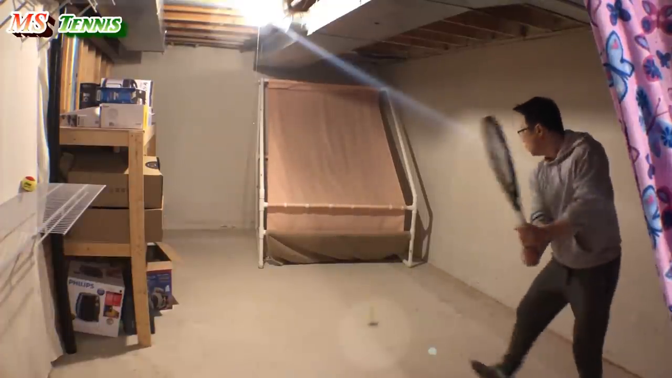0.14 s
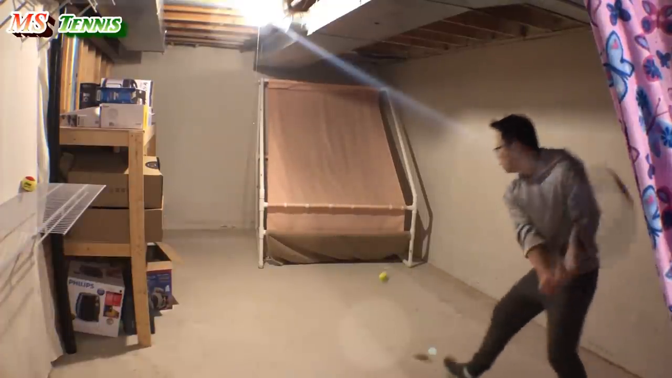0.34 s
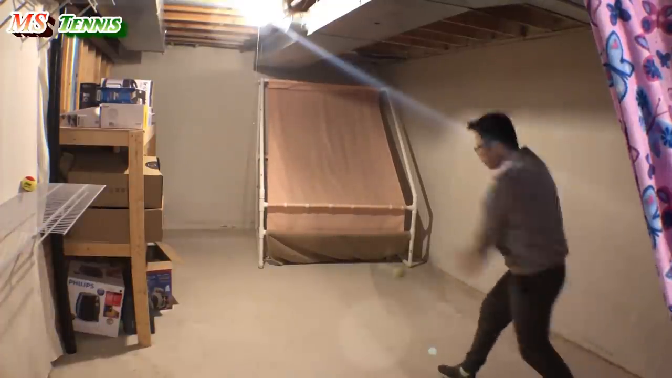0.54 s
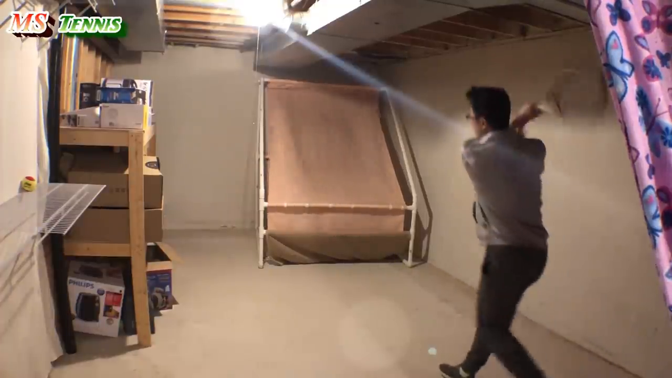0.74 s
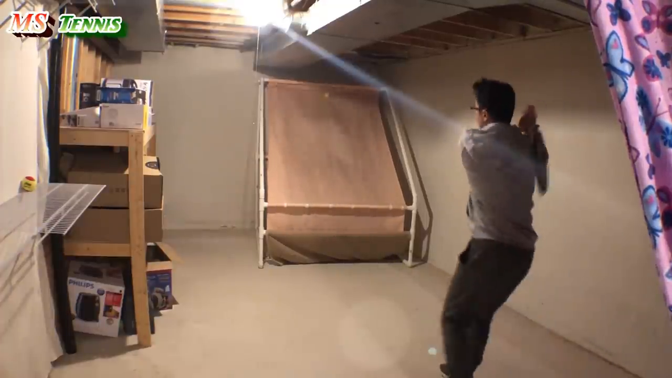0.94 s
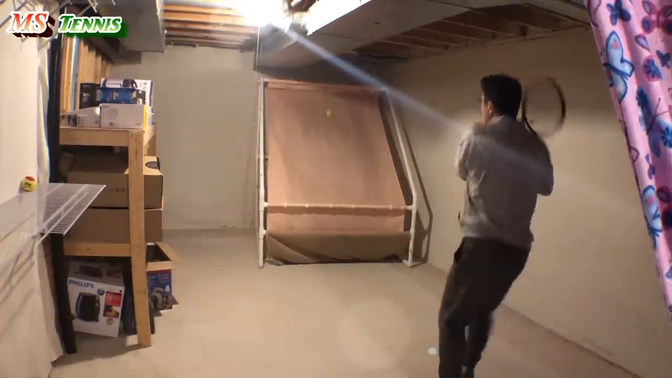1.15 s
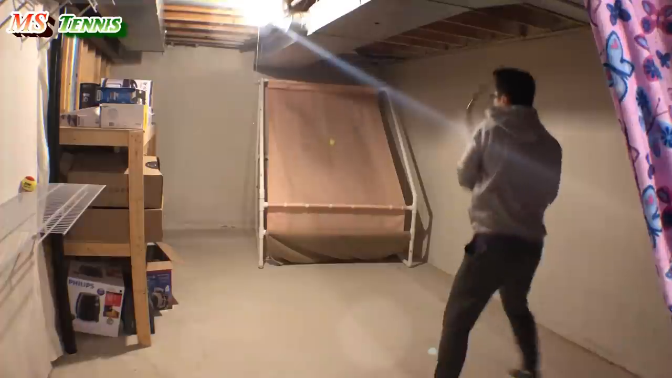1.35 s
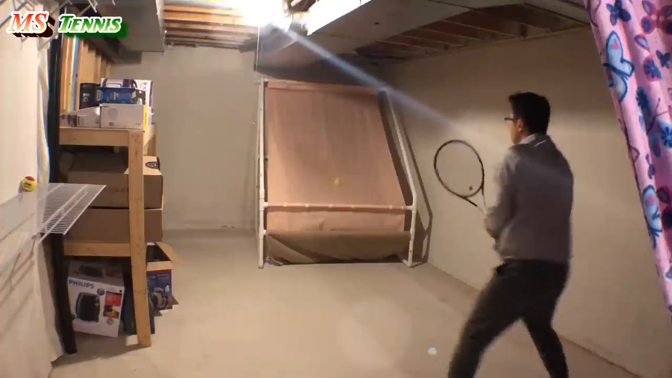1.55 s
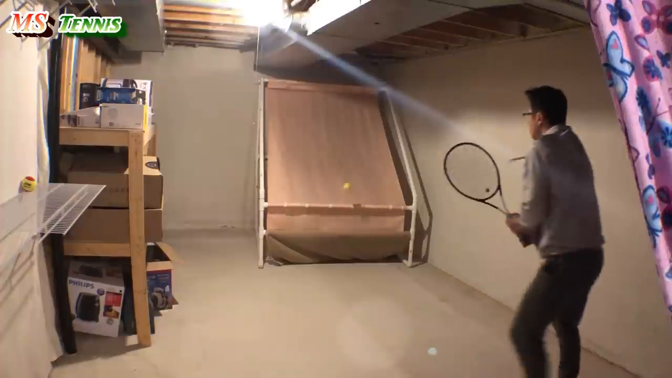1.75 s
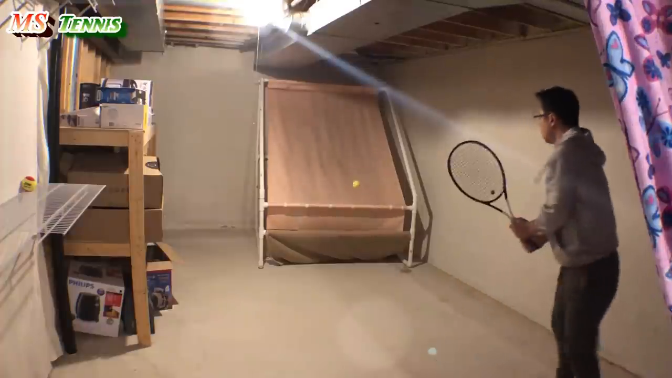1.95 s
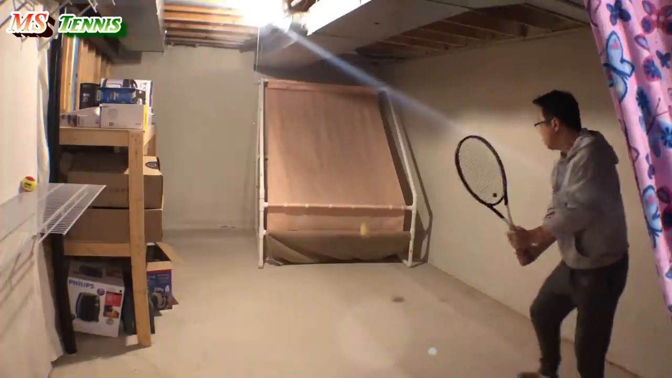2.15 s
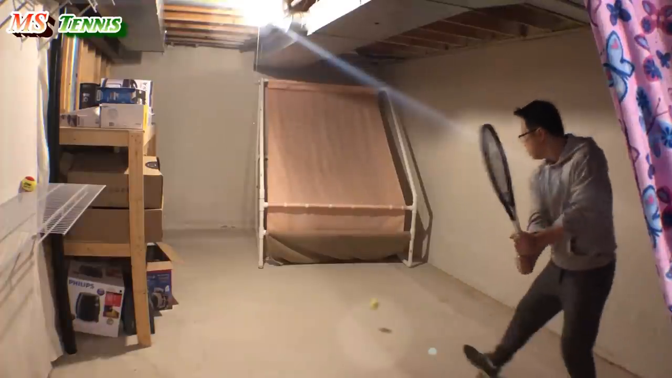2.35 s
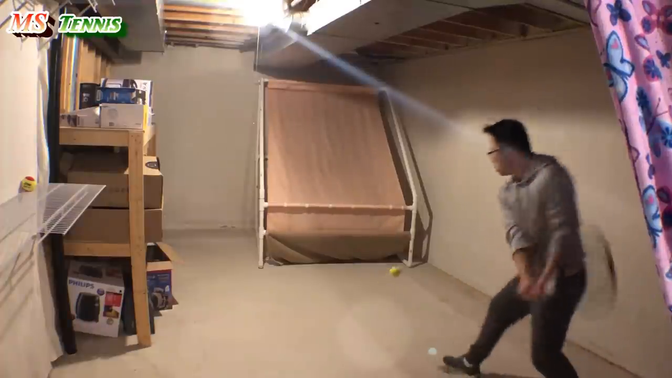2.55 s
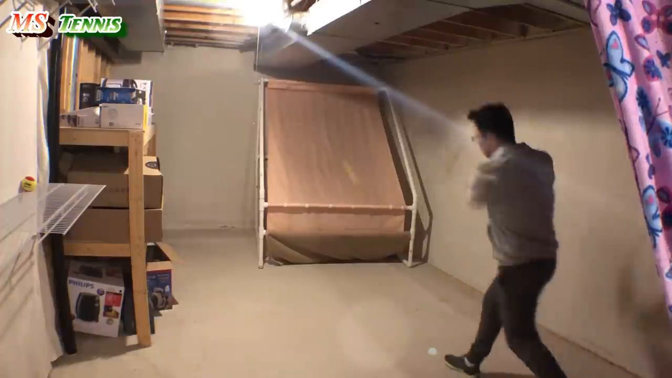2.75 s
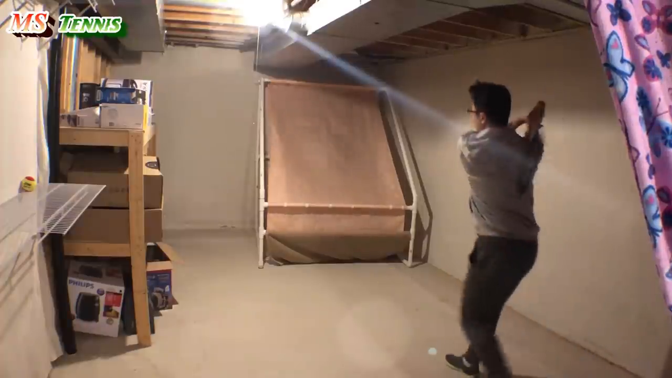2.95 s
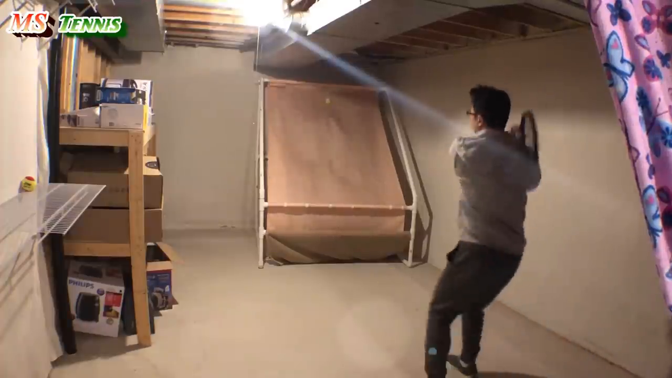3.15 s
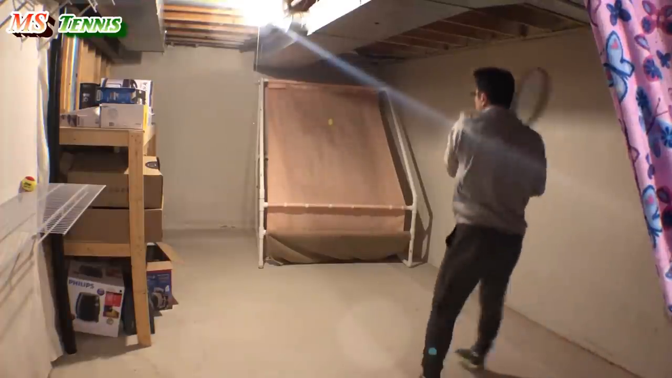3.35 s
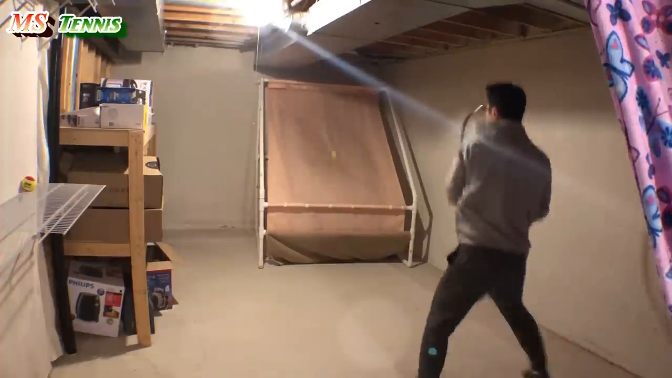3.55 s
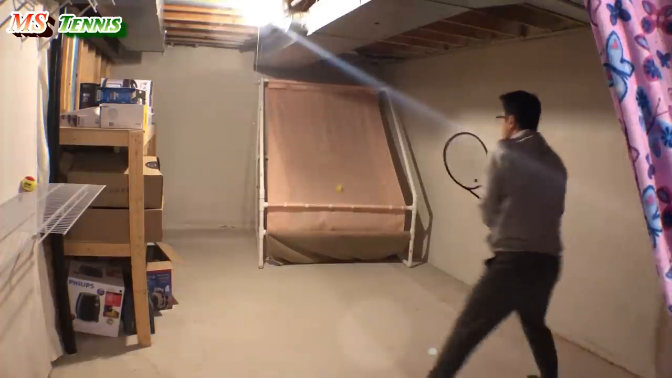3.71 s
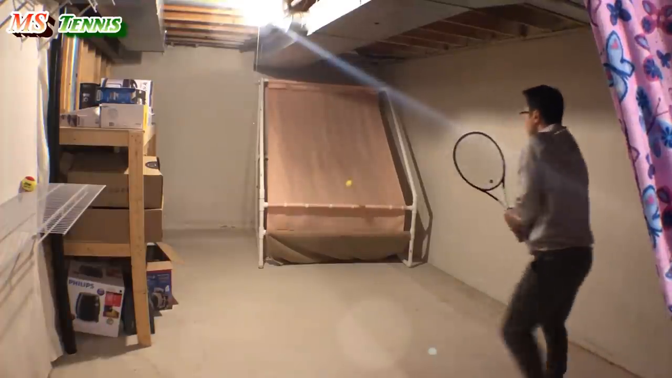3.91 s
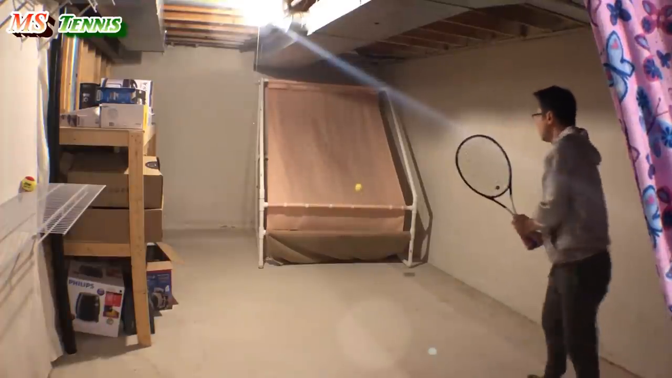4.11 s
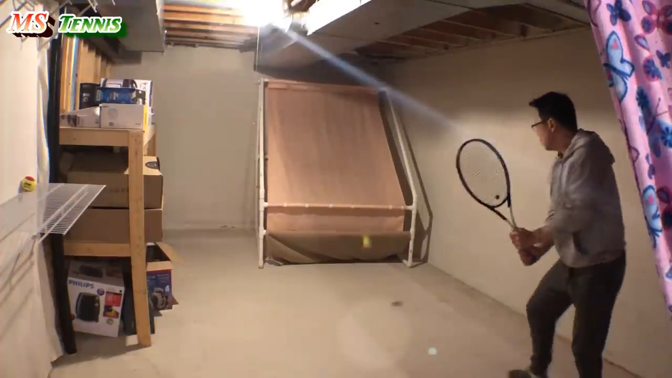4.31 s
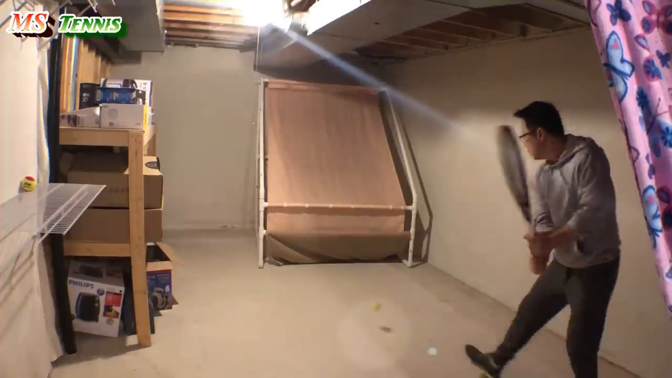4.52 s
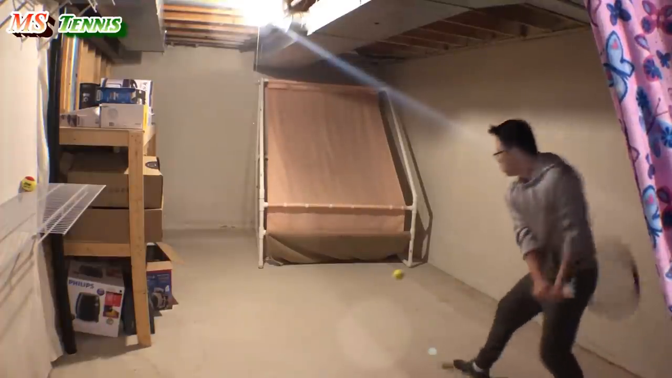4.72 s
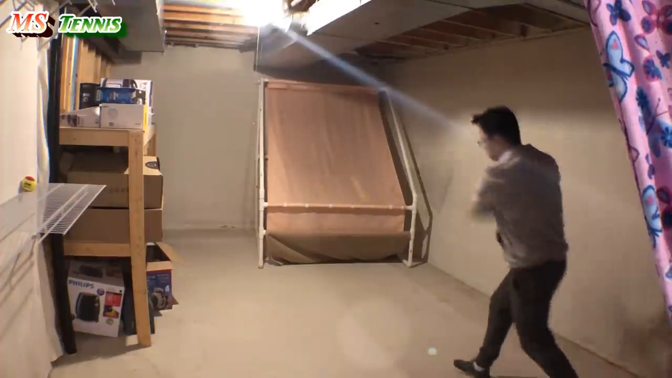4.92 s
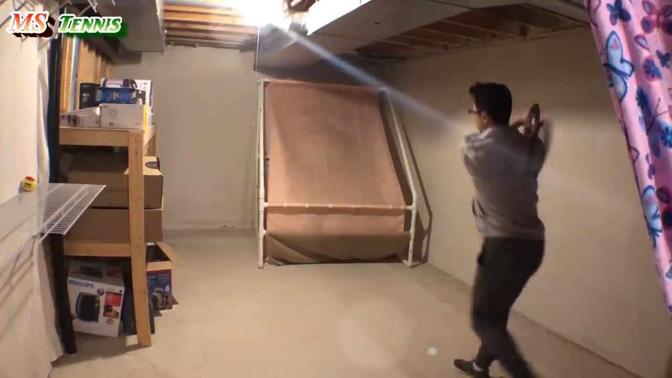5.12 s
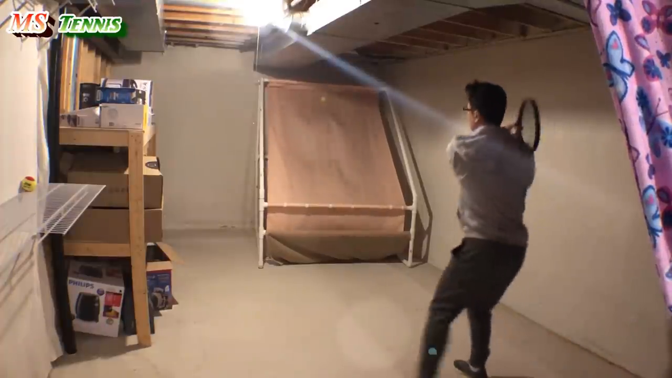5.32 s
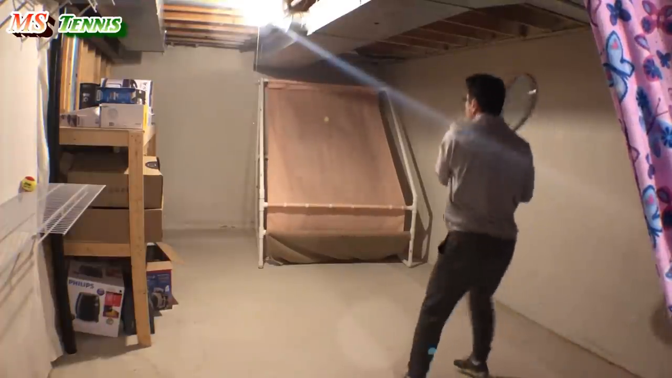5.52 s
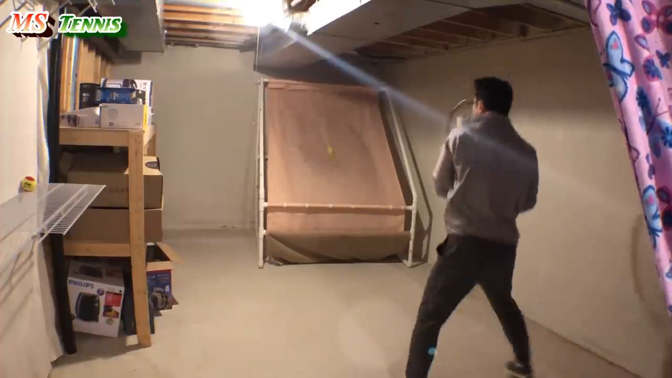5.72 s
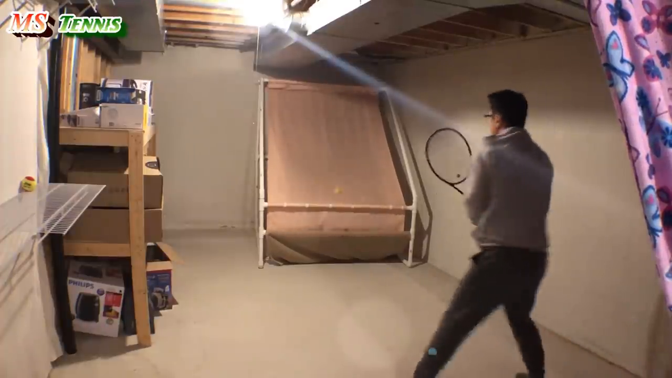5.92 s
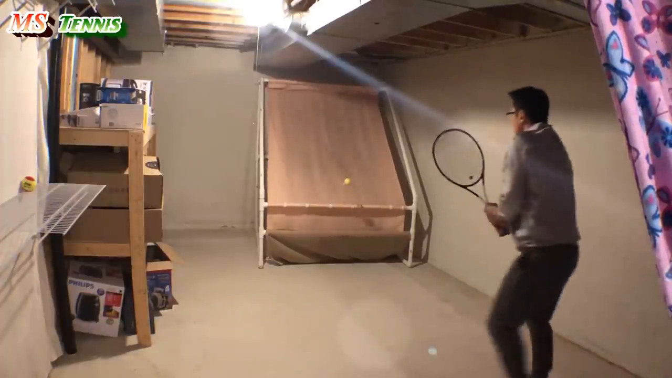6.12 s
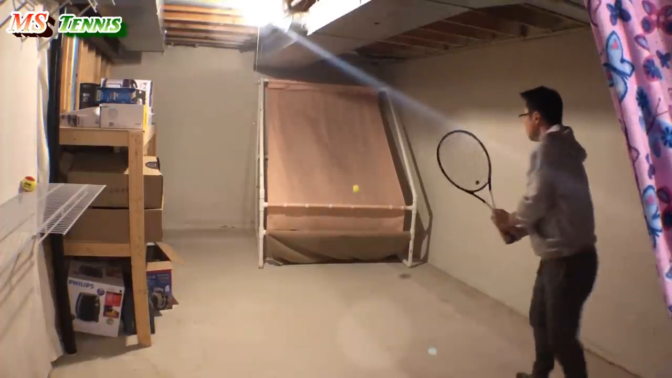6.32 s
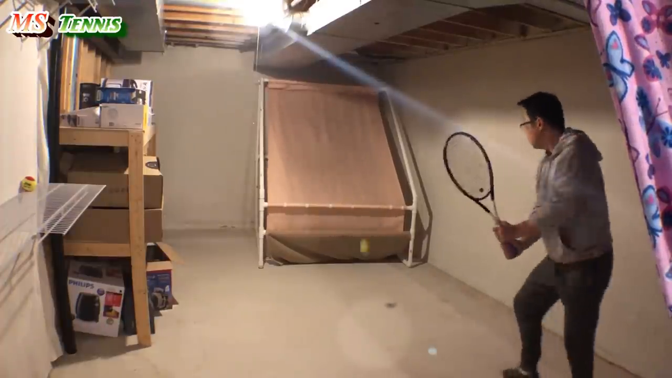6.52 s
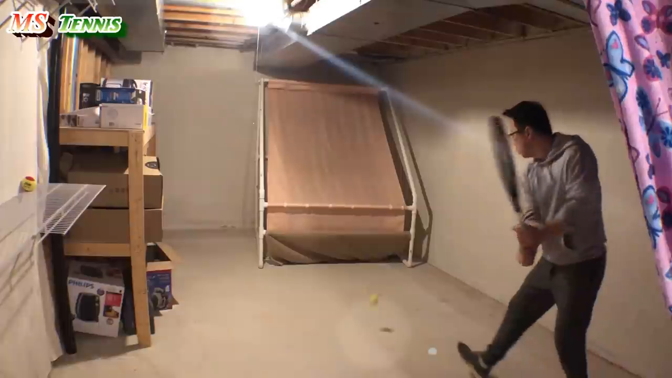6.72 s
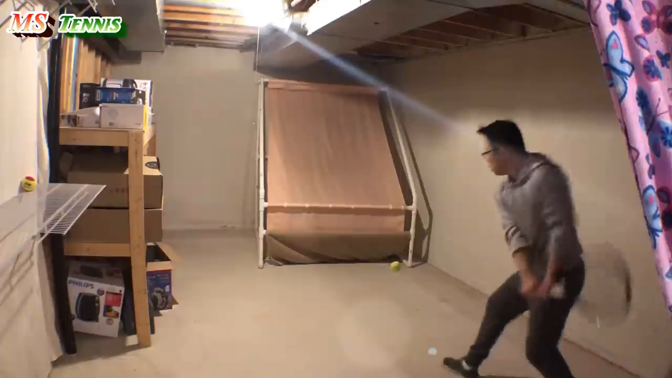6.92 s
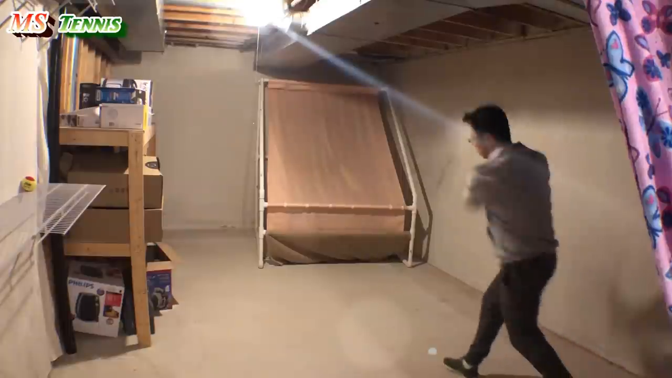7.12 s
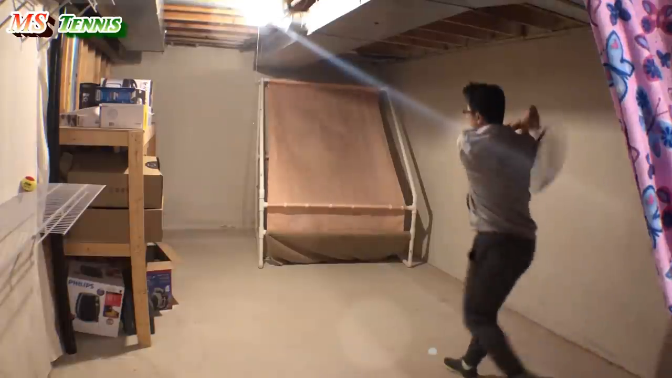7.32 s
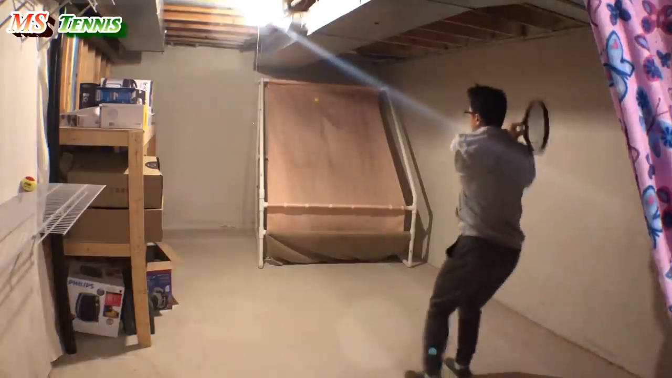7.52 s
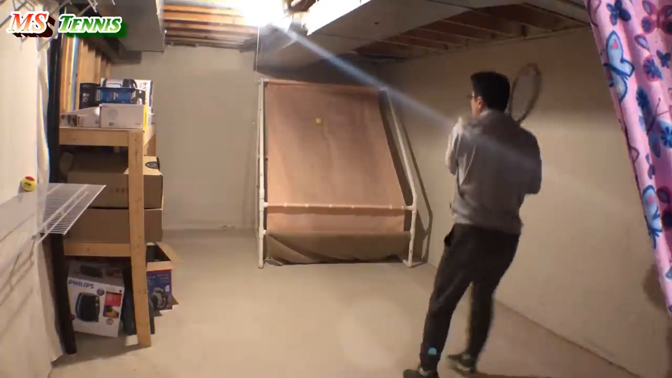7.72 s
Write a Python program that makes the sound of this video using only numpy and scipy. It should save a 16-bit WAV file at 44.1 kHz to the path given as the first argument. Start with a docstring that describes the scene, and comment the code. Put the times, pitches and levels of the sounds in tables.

```python
"""Tennis practice in a concrete basement

Four times a ball bounces on the floor and a racket strikes it, setting the strings ringing. A homemade
rebounder, a sheet on a pipe frame, catches it, snaps taut and flaps, and the pipes knock in their joints.
The ball taps down the sheet and rolls off the hem while shoes scuff and squeak. Each contact is a force
filtered by the spectrum of the struck body and by the reflections of the small room."""
import sys
import numpy as np
from scipy import signal
from scipy.fft import rfft, irfft
from scipy.io import wavfile

SR = 44100
rng = np.random.default_rng(int(sys.argv[2]) if len(sys.argv) > 2 else 0)


def unload_wav(signal):
    """Save mono or channel-first audio to the path in sys.argv[1] as 16-bit WAV at rate SR, clipped to [-1, 1]."""
    wavfile.write(
        sys.argv[1],
        SR,
        np.round(np.clip(np.atleast_2d(signal).T, -1, 1) * 32767).astype(np.int16),
    )


N = 346537
SIZE = 32768  # samples in one event
T, HZ = np.arange(SIZE) / SR, np.fft.rfftfreq(SIZE, 1 / SR)
FADE_OUT = (1 - (T / T[-1]) ** 10) ** 2

# racket on ball: start_s, level_db, body_db, pop_hz, pop_db, strings_db
STROKES = [(0.6207, 27.5, 1, 1019, -24, -0.5), (2.781, 26, 2, 1073, -22, 0),
           (4.962, 26.5, 1.5, 1070, -40, -.5), (7.1548, 25, 0.5, 1020, -44, -1.5)]
# spectrum of the yielding sheet: frequency_hz, level_db
SHEET_SPECTRUM = [(40, -21), (110, -1.5), (200, -3), (380, -3), (650, -9), (1000, -12), (2000, -8.5),
                  (2900, -12.5), (4000, -21.5), (6000, -30), (9500, -38), (15000, -45)]
# spectrum of the taut sheet and its frame: frequency_hz, level_db
TAUT_SPECTRUM = [(40, -4), (85, -3), (170, -7.5), (290, -3), (420, 0), (600, -1.5), (760, -8), (1000, -4.5),
                 (1500, -12.5), (2300, -6), (2900, -12), (4000, -21), (7000, -33.5), (15000, -45)]
# spectrum of felt tapping cloth: frequency_hz, level_db
TAP_SPECTRUM = [(50, 0), (150, -13), (350, 0), (800, -4.5), (1500, -5), (2400, -6), (4000, -15.5),
                (7000, -26), (15000, -41)]


def racket(pop_t60_s=0.19, grind_db=-9, contact_s=0.0028):
    """Impact excitation: the felt grinds briefly, the ball pops and the racket rings in its modes."""
    spectrum = [(40, -18.5), (130, -11.5), (280, -5.5), (420, 0), (540, -9.5), (800, -6), (1050, 3),
                (1480, -14.5), (1850, -8), (2400, -11), (2950, -16.5), (4700, -21.5), (8000, -34),
                (15000, -50.5)]  # blow on the string bed: frequency_hz, level_db
    string_modes = [(251, -29, 0.52), (379, -42.5, 0.71), (402.4, -34, 0.51), (444, -39, 0.18),
                    (920, -32, 0.14), (1130, -40, 0.32), (1707, -36, 0.57), (1738, -39.5, 0.55),
                    (2410, -45.5, 0.78), (2230, -49, 0.2), (3210, -40, 0.28), (3280, -41.5, 0.43),
                    (4300, -51.5, 0.28), (2333, -36.5, 0.26), (4930, -40, 0.21)]  # strings and racket frame: pitch_hz, level_db, t60_s
    out = np.zeros(N)
    for s, db, body_db, pop_hz, pop_db, strings_db in STROKES:
        grind = unit(np.exp(-T / contact_s) * rng.standard_normal(SIZE))
        force = (T == 0) + amp(grind_db) * grind
        add(out, s, blow(spectrum, db, tilt=-0.32, body_db=body_db, direct_db=-10.5, force=force))
        strings = amp(strings_db) * ring(string_modes, scatter=0.85)
        pop = ring([(pop_hz, pop_db, pop_t60_s)], scatter=1)
        add(out, s + .002, strings + pop)
    return out


def rebounder(taut_s=.065):
    """A membrane under sudden tension: the sheet stretches, then snaps taut; both jolts push the air."""
    catches = [(0.7454, 9.5, 23.5, 28.5), (2.9058, 18, 23, 28.5), (5.092, 8, 23, 26.5), (7.281, 23, 24, 26)]  # ball into the sheet: start_s, slap_db, stretch_db, snap_db
    slaps = [(s, db) for s, db, _, _ in catches]
    stretches = [(s, db) for s, _, db, _ in catches]
    snaps = [(s + taut_s, db) for s, _, _, db in catches]
    out = hits(slaps, SHEET_SPECTRUM, direct_db=-8, tilt=-1.56, body_db=7.5)
    out += crackles(stretches, SHEET_SPECTRUM, direct_db=-5.5, per_s=4700, spread_db=3,
                    rise_s=0.0035, fade_s=0.09, tilt=0.68, body_db=6)
    out += crackles(snaps, TAUT_SPECTRUM, direct_db=0, per_s=3000, spread_db=2.5,
                    rise_s=0.0045, fade_s=.016, tilt=-0.075, body_db=2)
    out += thumps(shifted(stretches, delay_s=.0225, gain_db=-41), hz=94.6, width_s=0.0094, boom_db=-0.5)
    out += thumps(shifted(snaps, delay_s=.0215, gain_db=-47), hz=90, width_s=0.013, boom_db=3.5)
    return out + flapping(snaps)


def thumps(rows, hz, width_s, boom_db, lead_s=0.05):
    """Modal coupling: the sheet shoves the air like a slack drum and excites the room's standing waves."""
    room_modes = [(49.9, -23.5, 0.67), (62, -9, 0.33), (100.2, -26, 1), (130.3, -22, 1.1)]  # standing waves between the walls: pitch_hz, level_db, t60_s
    out, t = np.zeros(N), T - lead_s
    for s, db in rows:
        add(out, s - lead_s, amp(db) * np.exp(-(t / width_s) ** 2) * np.cos(2 * np.pi * hz * t))
        add(out, s - .004, amp(db + boom_db) * ring(room_modes))
    return out


def flapping(snaps, flap_db=-8, rise_s=0.045, fade_s=0.46):
    """Damped free vibration: after each snap the sheet goes on wobbling with a low noise."""
    spectrum = [(30, -46), (50, -8.5), (70, -2), (100, 3.5), (135, -6.5), (175, -12), (280, -19.5),
                (1000, -40.5), (2500, -26.5), (6000, -42.5), (15000, -60)]  # wobbling sheet: frequency_hz, level_db
    out, t = np.zeros(N), np.arange(2 * SIZE) / SR
    for s, db in snaps:
        wobble = coloured(rng.standard_normal(SIZE), db + flap_db + read(spectrum, HZ))
        add(out, s, 2 * np.tile(wobble, 2) * np.exp(-t / fade_s) * np.minimum(t / rise_s, 1))
    return out


def pipe_frame():
    """Force transmission: the taut sheet jerks the pipes, which knock in their joints."""
    knocks = [(0.8173, 23, 3.5), (2.9923, 18, -9), (5.1665, 25, 1), (5.185, 21.5, -5), (7.346, 18, 9.5),
              (7.361, 20, 7.5)]  # pipe joints: start_s, level_db, body_db
    return sum(hits([(s, db)], TAUT_SPECTRUM, direct_db=3, tilt=-0.11, body_db=body_db)
               for s, db, body_db in knocks)


def floor_bounces():
    """Elastic impact: the hollow ball rebounds from the concrete before each stroke."""
    bounces = [(0.2395, 12), (2.3995, 10.5), (4.569, 11.5), (6.755, 11.5)]  # ball on the floor: start_s, level_db
    spectrum = [(40, -31), (100, -13.5), (175, -17), (215, 0.5), (300, -2), (400, -15), (560, -20),
                (850, -13.5), (1050, -0.5), (1600, -10), (2300, -11.5), (2800, -19.5), (3700, -35),
                (12000, -80)]  # bouncing ball: frequency_hz, level_db
    return hits(bounces, spectrum, direct_db=-2.5, tilt=.1, body_db=1.3)


def sheet_swings(swing_s=0.25):
    """Damped swinging: the slack sheet rustles as it swings back, then again, weaker and duller."""
    rustles = [(1.028, 9, -26, 2.5), (3.199, 7.5, 8, -7), (5.416, 10, 4, -14), (7.590, 11.5, 5, -9)]  # swings of the sheet: start_s, level_db, body_db, next_swing_db
    spectrum = [(60, -20), (300, -16), (900, -17.5), (1800, -9.5), (2600, -9.5), (4800, -19), (8000, -29),
                (15000, -44.5)]  # creasing cloth: frequency_hz, level_db
    out = np.zeros(N)
    for s, db, body_db, next_db in rustles:
        out += crackles([(s, db)], spectrum, direct_db=-3, per_s=5500, spread_db=3,
                        rise_s=0.021, fade_s=0.024, tilt=1.17, body_db=body_db)
        out += crackles([(s + swing_s, next_db)], spectrum, direct_db=1, per_s=6000, spread_db=7,
                        rise_s=0.016, fade_s=0.029, tilt=-2.6)
    return out


def ball_taps():
    """Inelastic impact: the ball lands back on the cloth with a slap and a dull knock, then taps down."""
    landings = [(1.4100, 8, -34.5), (3.5797, 5, -23.5), (5.772, -0.5, -34)]  # ball back on the sheet: start_s, slap_db, knock_db
    taps = [(1.492, -1), (1.585, -6.5), (3.676, 0.5), (3.762, -5), (3.838, -5.5), (5.885, 3), (6.012, -8.5)]  # ball on its way down: start_s, level_db
    out, knock = hits(taps, TAP_SPECTRUM, direct_db=-15, body_db=0.5), dent()
    for s, slap_db, knock_db in landings:
        out += hits([(s, slap_db)], TAP_SPECTRUM, direct_db=-6, tilt=0.24, body_db=1.5)
        add(out, s, amp(knock_db) * knock)
    return out


def dent(start_hz=1400, end_hz=380, sink_s=0.0018, fade_s=0.0021):
    """A damped glide: the knock's pitch falls as the ball sinks into the cloth."""
    hz = end_hz + (start_hz - end_hz) * np.exp(-T / sink_s)
    return -np.sin(2 * np.pi * np.cumsum(hz) / SR) * np.exp(-T / fade_s)


def hem():
    """Rolling contact: the ball bumps the sheet's lower edge, crosses it and makes it sag with a thud."""
    rolls = [(1.730, 3.5), (3.90, 3.5), (6.085, 4)]  # ball over the hem: start_s, level_db
    bumps = shifted(rolls, delay_s=-0.0065, gain_db=-1)
    out = hits(bumps, TAP_SPECTRUM, direct_db=-11, tilt=-1.8, body_db=-5)
    out += crackles(rolls, SHEET_SPECTRUM, direct_db=-6.5, per_s=1500, spread_db=4,
                    rise_s=0.009, fade_s=0.016, tilt=-1.9, body_db=-5)
    return out + thumps(shifted(rolls, delay_s=0.0285, gain_db=-37.5), hz=65, width_s=0.0075, boom_db=2)


def shoes():
    """Friction and loading: soles thud as weight settles on them, and squeak and scuff on the concrete."""
    footfalls = [(6.48, -14.5), (7.015, -15.5)]  # dull thuds: start_s, level_db
    squeaks = [(2.638, 0), (3.755, -3)]  # brief squeaks: start_s, level_db
    scuffs = [(0.045, -9.5, -2, 0.0075, 0.025), (0.372, -17.5, 1, .03, 0.14),
              (1.940, -2.5, -1.5, 0.018, 0.028), (2.136, -9, -3.5, 0.012, 0.013),
              (4.116, 0.5, -2, 0.0022, .059), (4.723, -9.5, -4.5, 0.0035, 0.062),
              (4.85, -7.5, -5, 0.013, .055), (6.350, -2.5, -1.25, .024, 0.018),
              (6.562, -7, -4.5, 0.005, 0.026)]  # steps and scuffs: start_s, level_db, tilt_db_per_octave, rise_s, fade_s
    sole_spectrum = [(50, -17.5), (350, -6.5), (800, -11.5), (1500, -1), (2600, -5.5), (4500, -10),
                     (8000, -19), (15000, -25)]  # sole on concrete: frequency_hz, level_db
    squeak_spectrum = [(200, -46), (550, -15), (780, -4), (1100, -19), (3000, -31), (15000, -62)]  # squeaking sole: frequency_hz, level_db
    out = crackles(footfalls, sole_spectrum, direct_db=3, per_s=3000, spread_db=3,
                   rise_s=.007, fade_s=0.029, tilt=-9, body_db=4)
    out += crackles(squeaks, squeak_spectrum, direct_db=3, per_s=3150, spread_db=-5,
                    rise_s=0.0075, fade_s=0.0084)
    for s, db, tilt, rise_s, fade_s in scuffs:
        out += crackles([(s, db)], sole_spectrum, direct_db=0, per_s=3000, spread_db=0,
                        rise_s=rise_s, fade_s=fade_s, tilt=tilt, body_db=1.5)
    return out


def swishes(swish_db=-29, full_speed_s=0.013, build_s=0.029):
    """Turbulence: air hisses through the strings as the racket speeds up toward the ball."""
    spectrum = [(50, -24), (240, 1), (600, -19), (2500, -12), (5000, -28.5), (15000, -36.5)]  # air through the strings: frequency_hz, level_db
    out, speed = np.zeros(N), np.exp(-np.maximum(T - full_speed_s, 0) / build_s)
    for s, *_ in STROKES:
        rush = irfft(rfft(rng.standard_normal(SIZE)) * amp(swish_db + read(spectrum, HZ))) * speed
        add(out, s - 0.5, rush[:SR // 2][::-1])  # reversed, so it swells up to the stroke
    return out


def room_air():
    """Stationary noise: the faint, steady background of the room."""
    spectrum = [(25, -62), (38, -68), (50, -31.5), (70, -44.5), (250, -43.5), (500, -50.5), (1200, -56.5),
                (2200, -54.5), (2800, -58.5), (4000, -67), (5500, -71.5), (6800, -80), (8200, -71.5),
                (9700, -81.5), (12500, -81), (15000, -95.5)]  # basement air: frequency_hz, level_db
    return irfft(rfft(rng.standard_normal(N)) * amp(read(spectrum, np.fft.rfftfreq(N, 1 / SR))), N)


def basement(direct_db, early_db=-1, early_s=0.0038, dense_s=.07):
    """Room impulse response: direct sound, a few close reflections, echoes that thicken and die by band."""
    reverberation = [(60, 0.25), (160, 0.37), (400, 0.28), (1000, 0.38), (2600, 0.41), (6000, 0.31),
                     (10000, 0.24), (15000, 0.16)]  # decay between the walls: frequency_hz, t60_s
    early, late = rng.choice([-1., 1.], (2, SIZE))
    early *= (rng.random(SIZE) < 900 / SR) * (T > .0005) * np.exp(-T / early_s)
    density = np.minimum(.03 + (T / dense_s) ** 2, 1)
    echoes = late * (rng.random(SIZE) < density) / np.sqrt(density)
    hz, t, bands = signal.stft(echoes, SR, nperseg=256)
    decay = amp(-60 * t / read(reverberation, hz)[:, None])
    tail = signal.istft(bands * decay, SR, nperseg=256)[1][:SIZE]
    return unit(tail) + amp(direct_db) * ((T == 0) + amp(early_db) * unit(early))


def blow(spectrum, db, tilt, body_db, direct_db, force=(1,), body_hz=650, lag_s=0.003947, lag_hz=600):
    """Source and filter: a force heard through the room, with a tilt in dB per octave and a body hump."""
    heard = signal.fftconvolve(basement(direct_db), force)[:SIZE]
    # soft things yield gradually, so their bass comes a moment after the treble
    phase_lag = 2 * np.pi * lag_s * lag_hz * np.arctan(HZ / lag_hz)
    heard = irfft(rfft(heard) * np.exp(-1j * phase_lag))
    slope_db = tilt * np.log2(np.maximum(HZ, 200) / 1000)
    hump_db = body_db * np.exp(-2 * np.log2((HZ + 1) / body_hz) ** 2)
    return coloured(heard, db + read(spectrum, HZ) + slope_db + hump_db) * FADE_OUT


def hits(rows, spectrum, direct_db, tilt=0, body_db=0):
    """Impulse excitation: each sharp contact is a single click of force."""
    out = np.zeros(N)
    for s, db in rows:
        add(out, s, blow(spectrum, db, tilt, body_db, direct_db))
    return out


def crackles(rows, spectrum, direct_db, per_s, spread_db, rise_s, fade_s, tilt=0, body_db=0):
    """Shot noise: swarms of tiny random slips and creases that swell and fade."""
    out = np.zeros(N)
    swell = np.minimum(T / rise_s, 1) * np.exp(-np.maximum(T - rise_s, 0) / fade_s)
    for s, db in rows:
        sizes = rng.choice([-1., 1.], SIZE) * amp(spread_db * np.minimum(rng.exponential(1, SIZE), 3))
        force = sizes * swell * (rng.random(SIZE) < per_s / SR)
        add(out, s, blow(spectrum, db, tilt, body_db, direct_db, force))
    return out


def ring(modes, scatter=0):
    """Modal decay: a sum of dying sines whose starting phases spread over scatter cycles."""
    sines = sum(amp(db - 60 * T / t60_s) * np.sin(2 * np.pi * (hz * T + scatter * rng.random()))
                for hz, db, t60_s in modes)
    return sines * np.minimum(T / 0.0012, 1) * FADE_OUT


def coloured(burst, db, smoothing=.1):
    """Spectral shaping: a burst takes the broad spectrum db and keeps its finer peaks and notches."""
    spectrum, bins = rfft(burst, SIZE), np.arange(len(HZ))
    energy, reach = np.cumsum(abs(spectrum) ** 2), smoothing * bins + 30
    low, high = np.maximum(bins - reach, 0), np.minimum(bins + reach, bins[-1])
    mean_power = (np.interp(high, bins, energy) - np.interp(low, bins, energy)) / (high - low)
    return irfft(spectrum * causal(db - 10 * np.log10(mean_power + 1e-12)))


def causal(db):
    """Minimum phase: a frequency response with these gains that rings only after the blow."""
    log_gain = np.log(amp(np.r_[db, db[-2:0:-1]]))
    return np.exp(signal.hilbert(log_gain).conj())[:len(HZ)]


def amp(db):
    """Decibels to amplitude ratio."""
    return 10 ** (np.asarray(db) / 20)


def read(points, hz):
    """Linear interpolation over log frequency."""
    frequencies, values = np.transpose(points)
    return np.interp(np.log(hz + 1), np.log(frequencies), values)


def unit(x):
    """Normalisation to an energy of one."""
    return x / np.sqrt(np.sum(x ** 2) + 1e-20)


def add(mix, start_s, sound):
    """Superposition of a sound on the mix."""
    part = mix[max(round(start_s * SR), 0):][:len(sound)]
    part += sound[:len(part)]


def shifted(rows, delay_s, gain_db):
    """The same events, offset in time and level."""
    return [(s + delay_s, db + gain_db) for s, db in rows]


def scene():
    """Superposition: ball, racket, rebounder, shoes and room air sum in one channel."""
    ball = floor_bounces() + ball_taps() + hem()
    return (ball + swishes() + racket() + rebounder() + pipe_frame() + sheet_swings()
            + shoes() + room_air())[None]


def record(dry, low_cut_hz=40, high_cut_hz=15950):
    """Transducer response: a small microphone's resonances, bass cut and band limit."""
    resonances = [(2518, 335, 6.5), (6826, 380, 6), (8400, 850, -11.5), (9150, 1200, 7), (15000, 970, 11)]  # microphone peaks and dip: centre_hz, width_hz, gain_db
    colour_db = sum(db * np.exp(-((HZ - hz) / width_hz) ** 2) for hz, width_hz, db in resonances)
    heard = signal.oaconvolve(dry, irfft(causal(colour_db))[None, :SIZE // 16], axes=1)[:, :N]
    high_pass = signal.butter(3, low_cut_hz, "high", fs=SR, output="sos")
    low_pass = signal.firwin(511, high_cut_hz, window=("kaiser", 9), fs=SR)
    heard = signal.sosfiltfilt(high_pass, heard, padtype="even")
    return signal.oaconvolve(heard, low_pass[None], "same")


dry = scene()
out = record(dry)
unload_wav(out)
```